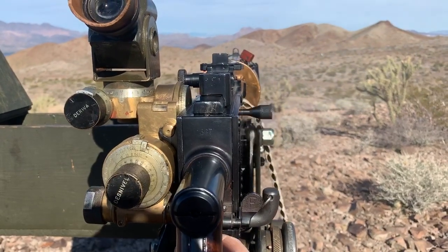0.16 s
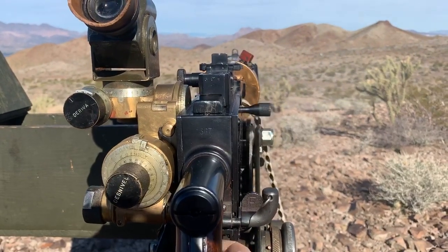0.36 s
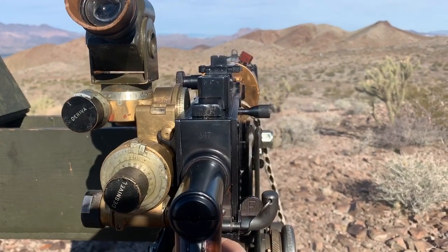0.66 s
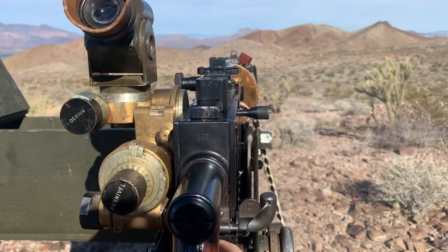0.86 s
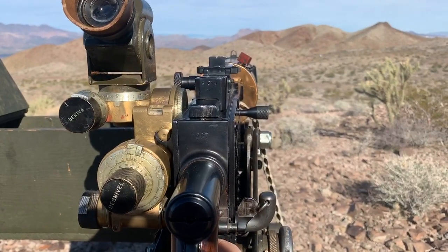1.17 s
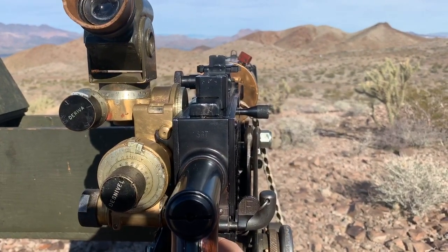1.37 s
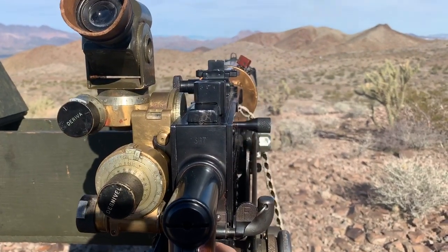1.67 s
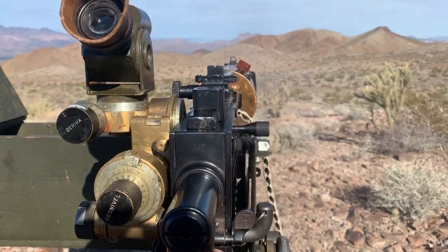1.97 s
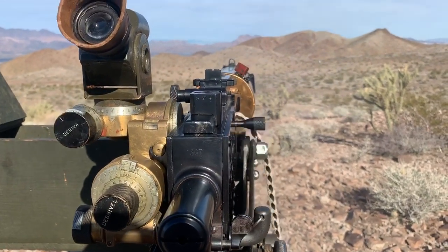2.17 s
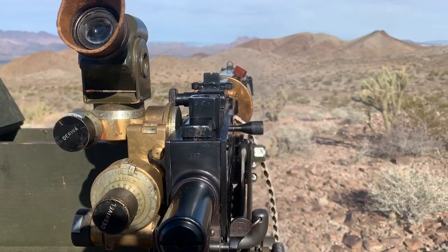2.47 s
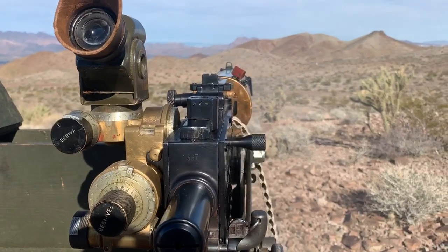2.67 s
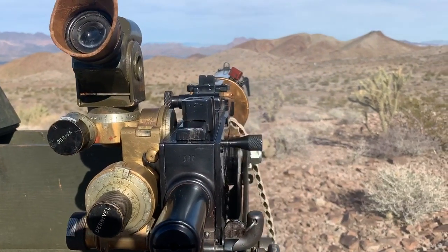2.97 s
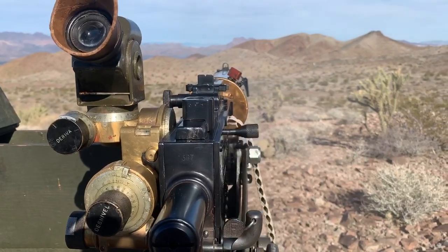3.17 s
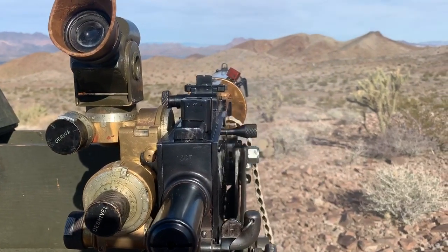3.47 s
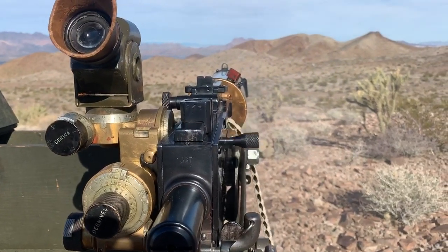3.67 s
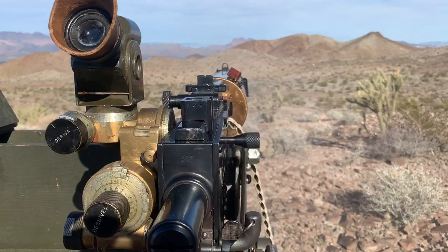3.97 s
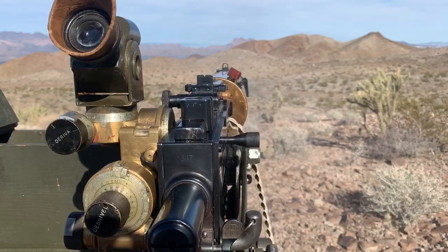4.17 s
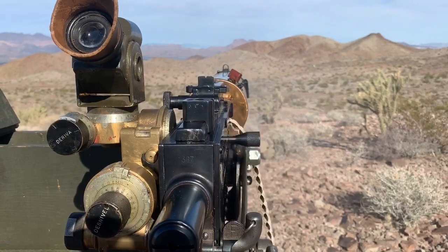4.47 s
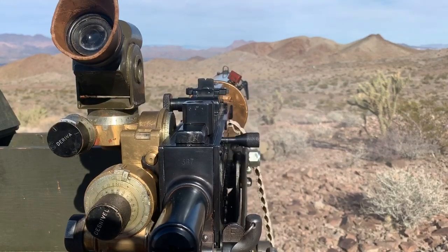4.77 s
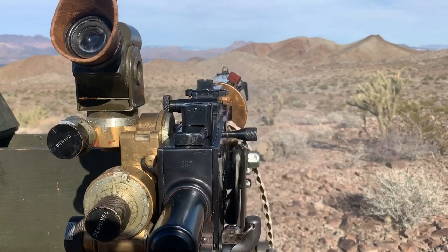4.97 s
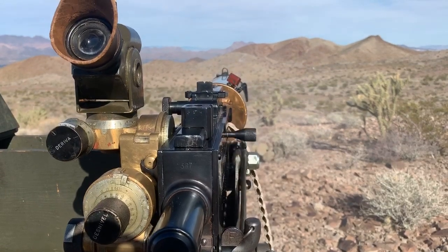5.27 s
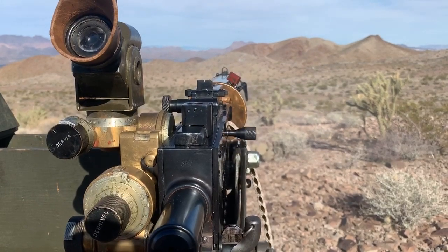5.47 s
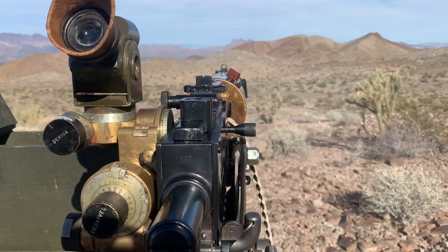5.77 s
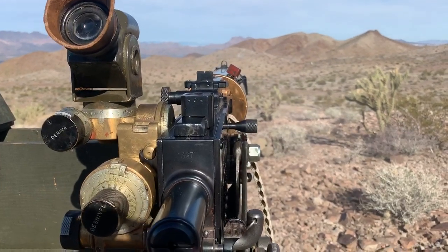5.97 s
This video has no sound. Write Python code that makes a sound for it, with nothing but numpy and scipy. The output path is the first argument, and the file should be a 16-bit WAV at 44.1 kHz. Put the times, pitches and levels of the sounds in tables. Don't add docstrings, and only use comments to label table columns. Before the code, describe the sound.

The sound opens in the fading roar of a machine-gun shot, close behind the gun in open desert. Two more blasts land at 0.09 and 0.23 seconds, then the bolt knocks shut near 0.37. Until 1.5 seconds the hills return a dull fading wash over light wind, while brass cases tick and ring thinly on stones, with small pebble knocks, strongest around 0.6 and 0.84. From 1.5 to 5.04 seconds a long burst hammers steadily, nearly seven shots a second: each has a rushing bolt, a cracking blast with quick reflections, a harsh gas roar, a short midrange steel ring, low stand thud and light feed clacks. Loudness softly saturates the close stereo microphone. At 5.17 the bolt snaps shut with a metallic clack. Cases scatter brightly until about 5.9 as the distant wash and breeze sink toward stillness by 6.1.

```python
import sys
import numpy as np
from scipy import signal
from scipy.fft import rfft, irfft, next_fast_len
from scipy.io import wavfile
from scipy.ndimage import map_coordinates

SR = 44100
rng = np.random.default_rng(int(sys.argv[2]) if len(sys.argv) > 2 else 0)


def master(y):
    cut = np.clip(np.atleast_2d(y).T, -1, 1)
    pcm = np.round(cut * 32767)
    wavfile.write(sys.argv[1], SR, pcm.astype(np.int16))


def gain_from_decibels(decibels):
    exponent = np.asarray(decibels, float) / 20
    return 10 ** exponent


N = 269886
SPAN, PRE = SR // 4, SR // 32


def unit(x):
    return x / np.sqrt(np.mean(x ** 2) + 1e-20)


def along(points, hz):
    f, v = np.transpose(points)
    return np.interp(np.log(hz + 1), np.log(f + 1), v)


def filtered(x, response):
    m = next_fast_len(x.shape[-1] + SR // 40)
    spectrum = rfft(x, m) * response(np.fft.rfftfreq(m, 1 / SR))
    return irfft(spectrum, m)[..., :x.shape[-1]]


def band(centre_hz, width_hz):
    return lambda f: 1j * f * width_hz / (centre_hz ** 2 - f * f + 1j * f * width_hz)


def tent(ms, db, start_ms, end_ms, up, down):
    climb = up * np.clip(start_ms - ms, 0, None)
    fall = down * np.clip(ms - end_ms, 0, None)
    return gain_from_decibels(db - climb - fall) ** 2


def add(track, s, sound):
    track[..., round(s * SR) + SPAN:][..., :sound.shape[-1]] += sound


def clack(db, body, t60, rise=.0004):
    t = np.arange(SR // 11) / SR
    fade = gain_from_decibels(db - 60 * t / t60) * np.clip((t[-1] - t) / 0.014, 0, 1)
    fade *= (0.81 + 1.5 * np.exp(-t / .002)) * (1 - np.exp(-t / rise))
    return fade * unit(filtered(rng.standard_normal((2, len(t))), body))


# frequency in Hz, lead in radians.
PORT_LEAD = [(100, -1), (2000, 1), (3100, 1.04), (4000, 0.89), (4500, -0.04), (5000, 4), (7900, 5),
             (9000, 3), (12100, -3.5), (13500, -6), (15300, -10)]
# frequency in Hz, left over right in dB.
PORT_TILT = [(60, 0.0), (99, 0.0), (160, -0.5), (270, -0.5), (450, -1.5), (740, 0.0), (1220, 1.5),
             (2010, 1.0), (3330, -0.5), (5500, -3.5), (9080, -1.0), (15000, 0.0)]


def ports(pair, alike):
    m = next_fast_len(pair.shape[-1] + SR // 40)
    hz, z = np.fft.rfftfreq(m, 1 / SR), rfft(pair, m)
    turn = np.arccos(np.clip(along(alike, hz), -1, 1)) / 2
    mid, side = z[0] * np.cos(turn), z[1] * np.sin(turn)
    half = gain_from_decibels(along(PORT_TILT, hz) / 2) * np.exp(.5j * along(PORT_LEAD, hz))
    return irfft(np.array([(mid + side) * half, (mid - side) / half]), m)[..., :pair.shape[-1]]


# frequency in Hz, level in dB per Hz.
GAS_COLOUR = [(70, -33), (120, -10), (250, -5), (490, -0.5), (900, -1.5), (1360, -4.5), (2000, -2.5),
              (3000, -7), (4080, -6), (7500, -10), (10800, -13), (13600, -14), (15800, -17.5)]
# frequency in Hz, likeness from 0 to 1.
GUN_ALIKE = [(200, .8), (1000, .6), (2500, .5), (5000, .65), (8000, .82), (13000, .9)]


def roar(same):
    count = len(SHOTS) + 1
    noise = rng.standard_normal((2, count, SPAN))
    noise = np.sqrt(1 - same) * noise + np.sqrt(same) * rng.standard_normal((2, 1, SPAN))
    turns, start = rng.random((count, 2)).T[..., None]

    def colour(hz):
        ripple_db = 1.8 * np.cos((2 + 3 * turns) * np.log(hz + 1) + 2 * np.pi * start)
        return gain_from_decibels(along(GAS_COLOUR, hz) + ripple_db)

    gas = ports(filtered(noise, colour), GUN_ALIKE)
    low = filtered(gas, lambda hz: 1 / (1 + (hz / 1200) ** 2))
    ms = (np.arange(SPAN) - PRE) / SR * 1000
    after = ms > 0
    quiet_ms, quiet_down = 140, .5

    bright = tent(ms, -19.5, 0, 0, up=0.81, down=20)
    bright += tent(ms, -5, 0, 0, up=2.6, down=2.2)
    bright += after * tent(ms, 1, 5.5, 5.5, up=1.1, down=0.73)
    bright += after * tent(ms, -50, 0, quiet_ms, up=0, down=quiet_down)

    dull = tent(ms, -21, 0, 0, up=0.9, down=20)
    dull += after * tent(ms, -1, 14, 18, up=1.1, down=2.6)
    dull += after * tent(ms, -2.5, 4.5, 4.5, up=4, down=1.8)
    dull += after * tent(ms, -8.5, 37, 37, up=0.83, down=2.5)
    tail = tent(ms, -16, 0, 0, up=0, down=0.26)
    dull += after * tail * tent(ms, 0, 0, quiet_ms, up=0, down=quiet_down)
    return (np.sqrt(dull) * low + np.sqrt(bright) * (gas - low)) / gas.std()


# delay at left in ms, delay at right in ms, level in dB.
ECHOES = [(4.54, 3.9, -2), (6.5, 4.1, -14.5), (10.66, 9.6, -5.5), (13.2, 9.9, -21.5), (18.06, 17.2, -11.5),
          (19.505, 19.1, 0.5), (22.58, 11, -4), (36.8, 50, -20), (53.1, 29, -24)]


def blast():
    t = np.arange(SPAN) / SR
    hz = 930 + 1150 / (1 + np.exp(np.clip((.0018 - t) / .00012, -30, 30)))
    hz += 3.8e5 * np.clip(t - .0022, 0, .006)
    fade = np.clip(t / .0003, 0, 1) * (.7 + .5 * np.exp(-(t / .002) ** 2)) * np.exp(-(t / .0046) ** 3)
    sweep = -np.sin(2 * np.pi * np.cumsum(hz) / SR) * fade
    push = (1 - t / 0.00048) * np.exp(-t / 0.00046) * np.clip(t / 0.0001, 0, 1)
    wave = np.array([sweep, np.roll(sweep, -2)]) * .64
    for left, right, db in ECHOES:
        for side, ms in enumerate((left, right)):
            wave[side] += gain_from_decibels(db + 1.5) * np.interp(t - ms / 1000, t, push, left=0)
    return np.pad(wave, ((0, 0), (18, 0)))[:, :SPAN]


# frequency in Hz, level in dB, time to fade by 60 dB in seconds.
STEEL = [(230, -9.5, .15), (339.7, -5.5, 0.37), (373.8, 2.5, 0.12), (502.7, 1.5, 0.12), (638, -3, 0.066),
         (700, -2.5, 0.052), (837, 4.5, 0.099), (972, -4.5, 0.021), (979, 6, 0.071), (1070, -4.5, .06),
         (1470, -12, .05), (1840, -9.5, 0.029), (1930, -3.5, 0.067), (2440, -6.5, .05)]


def ringing():
    t, out = np.arange(SPAN // 2) / SR, 0
    for hz, db, t60 in STEEL:
        luck = rng.standard_normal((3, len(SHOTS) + 1, 1))
        size_db, detune, phase = luck * [[[3]], [[.012]], [[.5]]]
        turn = 2 * np.pi * (hz * (1 + detune) * t + rng.random()) + phase
        out = out + gain_from_decibels(db + size_db - 60 * t / min(t60, .2)) * np.sin(turn)
    return out * (1 - np.exp(-(t / .005) ** 2)) * np.clip((t[-1] - t) / .03, 0, 1)


def thud(db, hz, length):
    t = np.arange(SR // 10) / SR - np.array([[.0012], [0]])
    u = np.clip(t / length, 0, 12)
    cycles = hz * length * (.62 * u + 1.6 * (1 - np.exp(-u)))
    return gain_from_decibels(db) * u ** 2 * np.exp(2 - 2 * u) * np.sin(2 * np.pi * cycles)


def boom(db):
    body = lambda f: band(260, 320)(f) ** 2 - .3 * band(720, 600)(f) ** 2
    return clack(db + rng.normal(0, 2), body, 0.34, rise=0.016)


def bolt_stop(rock_db):
    loss_db, still_db = .19, -50
    return clack(-23.5 - loss_db * (rock_db - still_db), band(3500, 12000), 0.03, rise=.0001)


# delay in ms, level in dB, centre in Hz, width in Hz,
# time to fade by 60 dB in seconds.
FEED = [
    (51.6, -43, 2500, 5000, .03),
    (75.5, -44, 4800, 7000, 0.042),
    (86, -44, 3800, 1600, 0.06),
    (95, -45, 4300, 2200, 0.05),
    (111, -41, 5000, 9000, 0.03),
    (123, -34, 6000, 13000, 0.015),
]


def feed(track, s):
    for ms, db, hz, width, t60 in FEED:
        body = lambda f: band(hz, width)(f) ** 2
        late = rng.normal(0, .002)
        add(track, s + ms / 1000 + late, clack(db + rng.normal(0, 2.5) - 6, body, t60, rise=.0015))


# start in seconds, peak level in dB.
SEAR = [
    (0.3545, -35),
    (0.3732, -28),
    (0.377, -19.5),
    (5.1475, -44),
    (5.1735, -27),
    (5.1761, -20.5),
]
# frequency in Hz, width in Hz, level in dB.
LOCK = [(1460, 250, -3), (2190, 110, -2), (2870, 37, -5.5), (3705, 370, -5.5), (4336, 63, -11.5),
        (9000, 450, -5.5)]


def locking(track):
    def body(f):
        tones = sum((-1) ** k * gain_from_decibels(db) * band(hz, width)(f) for k, (hz, width, db) in enumerate(LOCK))
        return 0.24 * band(3000, 8000)(f) + tones

    for s, db in SEAR:
        add(track, s, clack(db - 8.5, body, 0.06))


# start in seconds, recoil thud in dB, stand rocking in dB, second rocking in dB.
SHOTS = [(0.0851, -21, -50, -56), (0.2293, -27, -55, -71), (1.5067, -23.5, -33.5, -45.5),
         (1.6512, -28, -30.5, -39.5), (1.798, -27.5, -34, -51), (1.9475, -24.5, -29.5, -53),
         (2.0927, -25.5, -33, -49), (2.2435, -17, -29.5, -28.5), (2.3896, -26.5, -26, -44.7),
         (2.5354, -40, -47, -53), (2.6782, -25.5, -53, -55), (2.8244, -25.5, -50.5, -59),
         (2.9756, -24, -27, -32), (3.1233, -25, -49.5, -57), (3.2684, -33.5, -52, -50.5),
         (3.4194, -25, -52.5, -57), (3.5651, -27, -50, -60.5), (3.7136, -40.5, -54.5, -48.5),
         (3.8657, -22, -27.5, -31), (4.0143, -22, -45.5, -57), (4.164, -25, -50.5, -54.5),
         (4.3057, -21.5, -49, -57.5), (4.4508, -29, -46, -61), (4.5985, -29, -34, -45),
         (4.7446, -25, -30, -49), (4.8913, -27, -30.5, -55.5), (5.0386, -23.5, -25.5, -31)]
EARLIER = (-0.0605, -25.5, -36, -33)


def gun():
    out, steel = np.zeros((2, 2, N + 2 * SPAN))
    wave, rings, roars = blast(), ringing(), roar(same=.25)
    rows = [EARLIER, *SHOTS]
    for k, (s, recoil_db, rock_db, again_db) in enumerate(rows):
        if s - rows[k - 1][0] > .3:
            run_up = roars[:, k, :PRE - SR // 250]
            roars[:, k, :PRE - SR // 250] = filtered(run_up, lambda hz: 1 / (1 + (hz / 7000) ** 16))
        add(out, s - PRE / SR, gain_from_decibels(-10) * roars[:, k])
        add(out, s, gain_from_decibels(-1.9 + rng.normal(0, .8)) * wave)
        add(out, s, gain_from_decibels(-25.5) * rings[k])
        add(out, s + 0.003, thud(recoil_db + 2, 72 + rng.normal(0, 12), 0.0095))
        add(steel, s + 0.033, boom(-34.5))
        add(steel, s + .034, bolt_stop(rock_db))
        feed(steel, s)
        add(out, s + .056, -thud(rock_db + 4.0, 54, 0.012))
        add(out, s + 0.11, thud(again_db + 3, 58, .013))
    locking(steel)
    return (out + ports(steel, GUN_ALIKE))[:, SPAN:SPAN + N]


def patchy(colour, db, depth_db, rate):
    noise = filtered(rng.standard_normal((2, N)), lambda hz: gain_from_decibels(along(colour, hz)))
    swell = map_coordinates(rng.standard_normal(N // 1000), [np.arange(N) / SR * rate])
    return gain_from_decibels(db + depth_db * swell) * unit(noise)


# quiet level in dB, dB above it at the shot, settling time in seconds.
HILLS = [
    (-70, 23, .33),
    (-73, 13, 1),
    (-99, 46, .3),
]
# frequency in Hz, level in dB per Hz.
RUMBLE = [(15, -51.5), (25, -21.5), (59, -9.5), (110, -2), (145, -7), (243, -1), (700, -21.5), (910, -57),
          (1540, -120)]
WASH = [(290, -35.5), (500, -7.5), (562, -13.5), (776, -5.5), (955, -13.5), (1190, -5), (1480, -8),
        (1890, -0.5), (2160, -3.5), (3520, -11.5), (7660, -35), (8720, -44.5), (11000, -43.5), (14300, -72),
        (22000, -120)]
HISS = [(2500, -31.5), (4000, 0.5), (8000, -5.5), (9500, -16), (12200, -18), (13100, -5.5), (14500, -29)]
GUST = [(20, -36), (45, -6), (90, 0), (200, -3), (330, -9), (600, -60)]
# time in seconds, strength in dB.
BREEZE = [
    (0.45, -69),
    (1.05, -65.5),
    (1.45, -67),
    (5.3, -66),
    (5.7, -70),
    (6.12, -75),
]


def hills():
    at, shots = np.arange(N) / SR, np.array([EARLIER[0], *np.transpose(SHOTS)[0]])
    since = at - shots[np.searchsorted(shots, at) - 1]
    layers = patchy(GUST, np.interp(at, *np.transpose(BREEZE)), depth_db=3, rate=25)
    for colour, (quiet_db, over_db, settle), depth_db in zip((RUMBLE, WASH, HISS), HILLS, (1.6, .8, 1.5)):
        layers = layers + patchy(colour, quiet_db + over_db * np.exp(-since / settle), depth_db, rate=18)
    return ports(layers, [(100, .95), (3000, 0.22)])


# start in seconds, peak level in dB, ring share in dB.
CASES = [(0.4456, -43, -21.5), (0.4643, -53, -13.5), (0.4997, -55, -8), (0.601, -39.5, -8.5),
         (0.616, -37.5, -7.5), (1.3184, -62, -15), (0.7416, -57, -11.5), (0.8287, -48, -4.5),
         (0.8416, -35, -11.5), (0.9302, -55, -5.5), (1.1421, -57, -3), (1.1718, -55, -0.5),
         (5.2091, -38, -9), (5.221, -46.5, -9), (5.2557, -41.5, -15), (5.2968, -64.5, 4.5),
         (5.3289, -53, -5), (5.3782, -62, -6), (5.4226, -57.5, -24), (5.5433, -55, 2), (5.5557, -45, -4.5),
         (5.6575, -56, -10), (5.6767, -62.5, 0), (5.6949, -50, -8), (5.7152, -57.5, -6.5),
         (5.7346, -50.5, -7.5), (5.7622, -45, -19), (5.7809, -48.5, -9), (5.8814, -61, -17),
         (5.931, -54.5, -20)]
# start in seconds, peak level in dB, pitch in Hz, thump in dB.
PEBBLES = [(0.631, -46.5, 895, 4), (0.633, -44.5, 1260, -0.5), (0.699, -60.5, 2050, -3),
           (0.8, -54, 1840, -18.5), (0.939, -54.5, 1780, -16.5), (1.121, -47, 1400, -17),
           (1.228, -48, 1270, -8), (1.405, -56, 1040, -13.5), (5.479, -56, 1148, -11.5),
           (5.616, -48, 1650, -14), (5.756, -49, 1810, -8)]
# start in seconds, peak level in dB, pitch in Hz, thump in dB.
CLINKS = [
    (0.633, -48, 3750, 3),
    (.511, -59, 3900, -20),
]


def brass():
    out, t = np.zeros((2, N + 2 * SPAN)), np.arange(SPAN // 2) / SR
    drops = []
    for s, db, ring_db in CASES:
        tick_hz = 3300 + 115 * (db + 59.5)
        drops.append((s, db, 12700 + 700 * rng.random(), ring_db, tick_hz))
    for row in SHOTS:
        a, b, c = rng.random(3)
        drops.append((row[0] + 0.071 + .09 * a, -58 + 14 * b, 12600 + 800 * c, -2, 7000))
    for s, db, hz, ring_db, tick_hz in drops:
        near = rng.choice([12300, 12700, 12950, 13300, 13550], size=2)
        tumble = np.cumsum(rng.normal(0, .035, (3, len(t))), axis=1)
        ring = gain_from_decibels(-60 * t / .15) * np.sin(2 * np.pi * hz * t + tumble[0])
        for f, p in zip(near, tumble[1:]):
            ring += gain_from_decibels(rng.normal(-4, 3) - 60 * t / .08) * np.sin(2 * np.pi * f * t + p)
        add(out[0], s, gain_from_decibels(db + ring_db + 1) * ring * np.clip((t[-1] - t) / .03, 0, 1))
        add(out, s, clack(db - 8.5, lambda f: band(tick_hz + 1500, 6500)(f) ** 2, 0.013))
    for s, db, hz, thump_db in [*PEBBLES, *CLINKS]:
        add(out, s, clack(db - 4.5, lambda f: band(hz, 900)(f) ** 2, 0.039))
        add(out, s, clack(db + thump_db - 4.5, lambda f: band(300, 200)(f) ** 2, 0.061))
    return ports(out, [(300, 0.42), (13000, 0.23)])[:, SPAN:SPAN + N]


def scene():
    return gun() + hills() + brass()


def roll_off(x):
    return signal.sosfilt(signal.butter(12, 15800, fs=SR, output="sos"), x)


# frequency in Hz, width in Hz, depth in dB.
PORT_DIPS = [(11880, 400, -16), (15050, 420, -16), (9000, 500, -2)]


def record(dry):
    x = dry / (1 + np.abs(dry / 1.25) ** 4) ** .25
    x = signal.sosfilt(signal.butter(2, 32, "highpass", fs=SR, output="sos"), x)

    def response(hz):
        dips_db = sum(db * np.exp(-((hz - c) / w * 2) ** 2) for c, w, db in PORT_DIPS)
        return gain_from_decibels(dips_db - 60 * np.clip((hz - 15780) / 150, 0, 1) ** 2)

    mix = np.clip(filtered(x, response), -1, 1)
    return roll_off(mix)


dry = scene()
out = record(dry)
master(out)
```